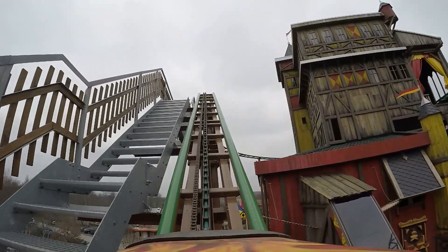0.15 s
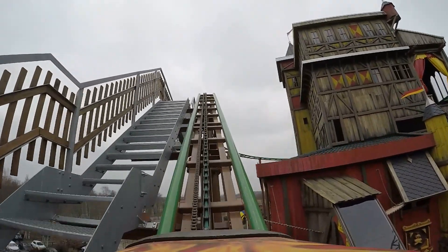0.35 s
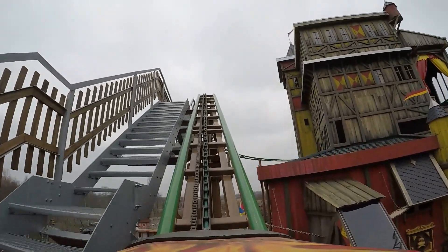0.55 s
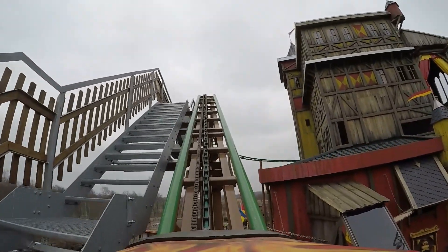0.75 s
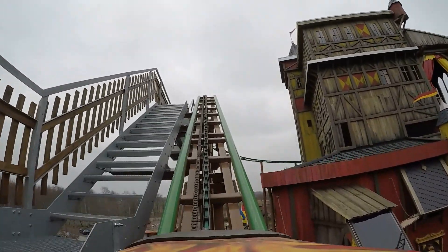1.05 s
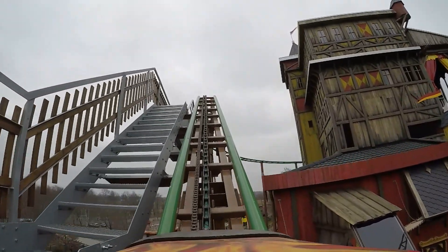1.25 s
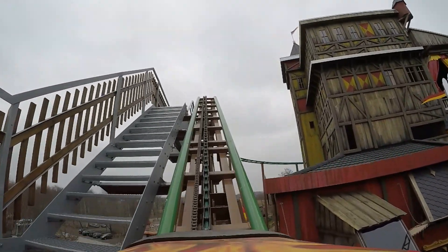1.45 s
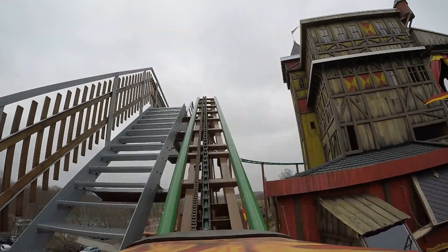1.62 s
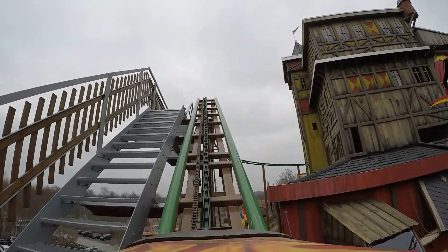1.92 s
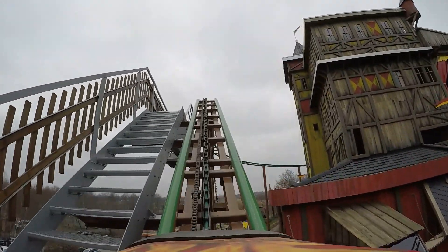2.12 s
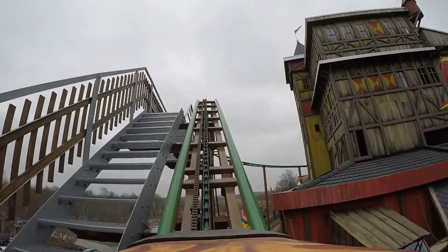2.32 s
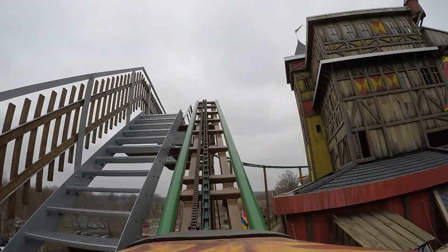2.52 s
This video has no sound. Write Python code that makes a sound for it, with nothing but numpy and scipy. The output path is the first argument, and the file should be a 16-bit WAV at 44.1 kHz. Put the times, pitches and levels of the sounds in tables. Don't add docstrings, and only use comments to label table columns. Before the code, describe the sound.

A roller coaster car is hauled up a chain lift with deep rumble and hard knocks

```python
import sys
import numpy as np
from scipy import signal
from scipy.io import wavfile

SR = 44100
rng = np.random.default_rng(int(sys.argv[2]) if len(sys.argv) > 2 else 0)


def to_linear_factor(level_db):
    exponent = np.asarray(level_db, float) / 20
    return 10 ** exponent


def unload_wav(signal):
    wavfile.write(
        sys.argv[1],
        SR,
        np.round(np.clip(np.atleast_2d(signal).T, -1, 1) * 32767).astype(np.int16),
    )


N = 117747
LEAD = 8192
M = N + LEAD
TIME_S = (np.arange(M) - LEAD) / SR
RISE_S = 0.002907


def unit(x):
    return x / np.sqrt(np.mean(x ** 2) + 1e-20)


def curve(rows):
    s, *columns = np.transpose(rows)
    return [np.interp(TIME_S, s, column) for column in columns]


def drift(rate_hz):
    pole = np.exp(-80 * np.pi * rate_hz / SR)
    noise = rng.standard_normal(M // 40 + 2002)
    slow = signal.lfilter([1], [1, -2 * pole, pole * pole], noise)[2000:]
    return np.interp(np.arange(M) / 40, np.arange(len(slow)), unit(slow - slow.mean()))


def bandpass(x, order, low_hz, high_hz):
    return signal.sosfilt(signal.butter(order, [low_hz, high_hz], "band", fs=SR, output="sos"), x)


def ring(x, modes):
    out = 0
    for k, (hz, db, t60_s) in enumerate(modes):
        r = to_linear_factor(-60 / (max(t60_s, .005) * SR))
        w = 2 * np.pi * hz / SR
        mode = signal.lfilter([0, np.sin(w)], [1, -2 * r * np.cos(w), r * r], x + 1e-18)
        out = out + (-1) ** k * to_linear_factor(db) * mode
    return out


def coloured(spectrum, patchy_db, rate_hz):
    hz, db = np.transpose(spectrum)
    edges_hz = 14 * 2 ** np.arange(0, 10.1, 1 / 3)
    white = rng.standard_normal((2, M))
    out = 0
    for k, (low_hz, high_hz) in enumerate(zip(edges_hz, edges_hz[1:])):
        mid_hz = np.sqrt(low_hz * high_hz)
        if hz[0] < mid_hz < hz[-1]:
            band = bandpass(white[k % 2], 2, low_hz, high_hz)
            band_db = np.interp(np.log(mid_hz), np.log(hz), db)
            out = out + band * to_linear_factor(band_db + patchy_db * drift(rate_hz))
    return unit(out)


def contacts(per_s, spread_db):
    hits = rng.random(M) < per_s / SR
    size = to_linear_factor(spread_db * np.minimum(rng.exponential(1, M), 3))
    return hits * size * rng.choice([-1, 1], M)


def soften(x):
    return signal.sosfilt(signal.butter(2, 2500, fs=SR, output="sos"), x)


def swell(s, length_s, rise_s=RISE_S):
    t = TIME_S - s
    return np.clip(t / rise_s, 0, 1) * np.exp(-(np.maximum(t, 0) / max(length_s, .003)) ** 2)


# (time [s], peak [dB], floor ring share [dB], contact length [s])
KNOCKS = [(.077, -16, -9.5, 0.018), (0.315, -8, 0.5, 0.0316), (0.378, -26, 2.5, 0.036),
          (0.439, -16, -17, 0.023), (0.674, -8, 1, 0.035), (0.708, -11, -10, 0.016),
          (0.751, -19.5, 6.5, 0.0091), (0.793, -19, 0, 0.042), (0.842, -22, 5.5, 0.029),
          (0.9, -18.5, -11.5, 0.029), (1.039, -23.5, 5.5, 0.034), (1.106, -28, 8, 0.018),
          (1.31, -17, -17, 0.016), (1.346, -23, 1.5, 0.035), (1.458, -18, -3, 0.038),
          (1.572, -25, -9, 0.0087), (1.657, -23, -16.5, 0.022), (1.715, -30, -10, 0.02),
          (1.752, -11.5, -4.5, 0.041), (1.808, -20, -3, 0.024), (1.884, -21.5, 3.5, 0.029),
          (1.926, -16, 1.5, 0.038), (1.979, -20, 3, 0.027), (2.09, -23, -9, 0.035),
          (2.127, -20.5, 6, 0.013), (2.276, -19.5, -11.5, .025), (2.316, -18.5, -20, 0.026),
          (2.388, -19.5, 2, 0.019), (2.458, -24.5, 7.5, 0.082), (2.538, -22, 0, 0.014),
          (2.64, -20.5, 3, .03)]
# (frequency [Hz], level [dB], t60 [s])
CHASSIS = [(189, -5.5, 0.057), (266, -6.5, 0.068), (330.4, -3.5, 0.04), (539, -9, 0.035),
           (665, -8.5, 0.056), (803, -10, 0.031), (924, -9.5, .04), (1233, -12, 0.013),
           (1497, -16.5, 0.024), (1670, -15.5, 0.022), (1980, -18.5, 0.012)]
# (frequency [Hz], level [dB], t60 [s])
FLOOR_RING = [(399.8, -5.5, 0.15), (442.5, 0, 0.12), (477, 0, 0.067)]
CHASSIS_DB, FLOOR_DB, FIRST_BLOW_DB = -3, -8.5, -2
WEAK_KNOCK_SLOWS = 0.55


def knocks():
    scuffle = unit(contacts(per_s=3000, spread_db=3.0)) * 0.09
    starts = ((np.array(KNOCKS)[:, 0] + RISE_S) * SR).astype(int) + LEAD
    blows = np.bincount(starts, minlength=M)
    grit = soften(scuffle + to_linear_factor(FIRST_BLOW_DB) * blows)
    solid, hollow = 0, 0
    for s, db, floor_db, length_s in KNOCKS:
        rise_s = RISE_S * to_linear_factor(-WEAK_KNOCK_SLOWS * (db + 8.5))
        shape = to_linear_factor(db) * swell(s, length_s, rise_s)
        solid = solid + shape
        hollow = hollow + to_linear_factor(floor_db) * shape
    return to_linear_factor(CHASSIS_DB) * ring(grit * solid, CHASSIS) + to_linear_factor(FLOOR_DB) * ring(grit * hollow, FLOOR_RING)


# (time [s], frequency [Hz], level [dB], length [s])
THUDS = [(.172, 181, -7.5, 0.011), (0.35, 188, -9.5, 0.0305), (0.35, 242, -10.5, 0.044),
         (0.39, 300, -18, 0.027), (0.68, 172, -13, 0.056), (0.71, 390, -14, 0.019), (0.92, 84, -13, 0.028),
         (0.98, 69.6, -5, 0.048), (1.775, 372, -15.5, 0.023), (2.4, 456, -20, 0.031),
         (1.343, 445, -20.5, 0.05), (.848, 480, -10, .024), (.692, 472, -16, 0.023), (.7, 330, -15, .02),
         (.795, 420, -18, .015), (.14, 620, -25, .02), (1.46, 200, -17, .04), (0.35, 870, -25.5, 0.018),
         (.68, 923, -15, 0.012), (0.42, 690, -28, 0.016), (.079, 678, -14.5, 0.011),
         (.318, 670, -12, 0.024), (.447, 662, -16.5, 0.012), (.679, 658, -10, 0.02),
         (1.042, 475, -16, 0.024), (1.757, 620, -23.5, 0.024), (1.758, 387, -15.5, 0.013),
         (1.79, 150, -14, .04), (.33, 400, -14, 0.022), (2.465, 470, -20, 0.028), (.815, 440, -18, .02),
         (.88, 440, -21, .02), (1.895, 450, -21, .025), (1.942, 440, -19, .025), (1.985, 450, -17, .03),
         (2.05, 450, -23, .02), (2.135, 450, -19, .015), (2.36, 440, -22, .025), (2.53, 450, -21, .03),
         (2.645, 480, -19, .02), (.715, 600, -16, .01), (.19, 300, -17, .02)]


def thuds():
    out = 0
    for s, hz, db, length_s in THUDS:
        out = out + to_linear_factor(db) * swell(s, length_s) * np.sin(2 * np.pi * hz * (TIME_S - s))
    return out


# (time [s], frequency [Hz], level [dB])
DRONE = [(0, 91.46, -22.5), (.13, 108.4, -26), (.2, 112.3, -14), (.3, 107.9, -16.5), (.36, 110.8, -28.5),
         (.56, 100.6, -17.5), (.79, 110.4, -17), (.9, 91.47, -12), (1.08, 90.8, -21), (1.25, 101.7, -15.5),
         (1.42, 103, -11), (1.5, 105.6, -16.5), (1.7, 103.3, -13), (1.79, 102.1, -17), (1.96, 104.7, -10),
         (2.05, 106.1, -17), (2.5, 102.9, -11.5), (2.67, 103.3, -17)]
SKIRT_HZ, SKIRT_DB, SINE_DB = 32, -3, -2.5


def drone():
    hz, db = curve(DRONE)
    phase = 2 * np.pi * np.cumsum(hz) / SR
    skirt = drift(SKIRT_HZ) * np.sin(phase) + drift(SKIRT_HZ) * np.cos(phase)
    tone = np.sqrt(2) * np.sin(phase)
    return to_linear_factor(db) * (to_linear_factor(SINE_DB) * tone + to_linear_factor(SKIRT_DB) * skirt)


# (time [s], peak [dB], frequency [Hz])
RAPS = [(.168, -32, 1700), (.248, -31.5, 1310), (.322, -18, 1480), (.385, -26, 700), (.683, -19, 1597),
        (0.711, -21, 1703), (.728, -33, 1305), (.8, -31.5, 1490), (.82, -30.5, 1100), (.846, -31, 1400),
        (.886, -28.5, 1102), (.897, -33, 1902), (.91, -29.5, 1698), (.918, -26, 1050), (.936, -27, 1150),
        (.962, -32.5, 1600), (1.06, -24, 952.6), (1.068, -29, 1895), (1.094, -30.5, 1104),
        (1.127, -29.5, 795), (1.152, -34, 1690), (1.193, -30.5, 1100), (1.204, -27, 1199),
        (1.216, -29.5, 1150), (1.268, -27.5, 900.6), (1.303, -32.5, 1144), (1.326, -27, 1253),
        (1.346, -29, 820), (1.36, -28, 940), (1.386, -30.5, 1148), (1.434, -28.5, 756), (1.53, -26, 800.5),
        (1.601, -30, 900), (1.67, -22, 1149), (1.694, -30, 900), (1.711, -27, 1070), (1.737, -26, 1000),
        (1.762, -26, 1480), (1.778, -28, 1100), (1.814, -24, 1251), (1.874, -32, 749.6), (1.965, -24, 1002),
        (2.093, -25.5, 899), (2.259, -30, 761), (2.283, -27.5, 900), (2.317, -27, 900), (2.327, -29, 1400),
        (2.361, -28.5, 750), (2.392, -26, 990), (2.466, -26.5, 700), (2.551, -26, 911.5),
        (2.643, -25.5, 700)]
RAP_S, RAP_SPREAD = .009, 1.226


def raps():
    out = np.zeros(M + SR)
    span_s = np.arange(2048) / SR
    shape = np.sin(np.pi * np.clip(span_s / (2 * RAP_S), 0, 1)) ** 2
    for s, db, hz in RAPS:
        grit = rng.standard_normal(len(span_s))
        burst = bandpass(grit * shape, 3, hz / RAP_SPREAD, hz * RAP_SPREAD)
        i = int((s - RAP_S / 2) * SR) + LEAD
        out[i:i + len(span_s)] += to_linear_factor(db) * burst / np.abs(burst).max()
    return out[:M]


# (time [s], level [dB])
CHATTER = [(0, -41.5), (.12, -45.5), (.3, -43.5), (.5, -47), (.64, -57.5), (.78, -41.5), (.95, -38),
           (1.01, -40.5), (1.12, -38), (1.3, -43.5), (1.42, -41.5), (1.55, -34.5), (1.86, -44.5),
           (2.05, -37), (2.23, -45), (2.4, -36), (2.58, -50.5), (2.67, -39.5)]
CHATTER_CHASSIS_DB, CHATTER_FLOOR_DB = -8.5, 4


def chatter(db):
    links = soften(contacts(per_s=300, spread_db=3.0))
    clumps = drift(38.0)
    even = np.clip(links / np.abs(links).max(), -.15, .15)
    rattle = unit(ring(links * to_linear_factor(5.8 * clumps), CHASSIS))
    hum = unit(ring(even * to_linear_factor(2.5 * clumps), FLOOR_RING))
    return to_linear_factor(db + CHATTER_CHASSIS_DB) * rattle + to_linear_factor(db + CHATTER_FLOOR_DB) * hum


# (time [s], peak [dB])
TICKS = [(0.446, -54), (.799, -53.5), (1.063, -49), (1.319, -56), (1.502, -49), (1.539, -50),
         (1.768, -50.5), (2.10, -53.5), (2.179, -55), (.915, -53.5), (2.278, -48), (2.388, -50)]
TICK_S, TICK_DB = .022, 2


def ticks():
    noise = unit(bandpass(rng.standard_normal(M), 3, 900, 4800))
    return noise * sum(to_linear_factor(db + TICK_DB) * swell(s, TICK_S) for s, db in TICKS)


# (time [s], length [s], frequency [Hz], level [dB])
SQUEAKS = [
    (1.975, .024, 3095, -48),
    (1.987, .024, 3255, -40),
    (2.011, .014, 3235, -48),
    (2.025, .11, 3225, -56),
    (2.071, .014, 3220, -48),
    (1.895, .016, 3750, -55),
    (2.125, .02, 2420, -47),
    (2.177, .012, 3050, -52),
    (1.065, .025, 7800, -66),
]
OCTAVE_DB = -17


def squeaks():
    t = np.arange(M) / SR
    out = 0
    for s, length_s, hz, db in SQUEAKS:
        tone = np.sin(2 * np.pi * hz * t) + to_linear_factor(OCTAVE_DB) * np.sin(4 * np.pi * hz * t)
        out = out + to_linear_factor(db) * swell(s, length_s) * tone
    return out


# (frequency [Hz], level [dB peak])
WHINE = [(5426, -75), (6013, -71), (6600, -79), (8936, -84), (9049, -85), (9103, -83)]
WHINE_SWAY_DB = 4


def whine():
    t = np.arange(M) / SR
    return sum(to_linear_factor(db + WHINE_SWAY_DB * drift(7.0)) * np.sin(2 * np.pi * hz * t) for hz, db in WHINE)


SHUDDER_HZ, SHUDDER_DB, SHUDDER_WANDER_HZ = 29, -25, 3.5


def shudder():
    level = to_linear_factor(SHUDDER_DB + 1.2 * drift(2.4))
    hz = SHUDDER_HZ + SHUDDER_WANDER_HZ * drift(4.2)
    return level * np.sqrt(2) * np.sin(2 * np.pi * np.cumsum(hz) / SR)


# (frequency [Hz], density [dB per Hz])
RUMBLE = [(8.8, -32), (15, -0.5), (38, 2.5), (100, -6), (173, -8.5), (345, -19.5), (446, -19.5),
          (516, -27.5), (700, -27), (910, -62), (1540, -120)]
# (time [s], level [dB])
GUST = [(0, 7), (.12, 0.5), (.3, 3.5), (.7, 2.5), (1.05, 0), (1.2, -1.5), (1.5, -1.5), (2.0, 1.8),
        (2.25, -2), (2.67, 0)]
RUMBLE_DB = -15.5


def rumble():
    gust_db, = curve(GUST)
    return to_linear_factor(RUMBLE_DB + gust_db) * coloured(RUMBLE, patchy_db=0.2, rate_hz=24.0)


# (frequency [Hz], density [dB per Hz])
HISS = [(650, -1.5), (1100, -6.5), (1600, -13), (2300, -18), (2900, -41), (3600, -43)]
HISS_DB, RATTLE_DB, RATTLE_HZ = -42, 2, 51


def hiss(links_db):
    level_db = HISS_DB + links_db - links_db.mean() + RATTLE_DB * drift(RATTLE_HZ)
    return to_linear_factor(level_db) * coloured(HISS, patchy_db=.7, rate_hz=29.0)


# (frequency [Hz], density [dB per Hz])
AIR = [(1500, 5), (2500, -0.5), (3000, -3.5), (4000, -3), (5300, -12), (8000, -16.5), (11000, -26),
       (13500, -34)]
# (time [s], level [dB])
AIR_LEVEL = [(0, -46.5), (.4, -47.5), (.7, -50), (1.2, -52.5), (1.5, -50.5), (2.0, -50), (2.3, -50.5),
             (2.67, -50.5)]


def air():
    air_db, = curve(AIR_LEVEL)
    return to_linear_factor(air_db + 0.2 * drift(16.0)) * coloured(AIR, patchy_db=1.5, rate_hz=9.0)


def scene():
    links_db, = curve(CHATTER)
    impacts = knocks() + thuds() + raps() + ticks()
    chain = drone() + chatter(links_db)
    wheels = squeaks() + whine()
    background = shudder() + rumble() + hiss(links_db) + air()
    return (impacts + chain + wheels + background)[None, LEAD:]


def band_limit(x):
    return signal.sosfilt(signal.butter(12, 12900, fs=SR, output="sos"), x)


def record(dry):
    mix = np.tanh(dry)
    return band_limit(mix)


dry = scene()
out = record(dry)
unload_wav(out)
```